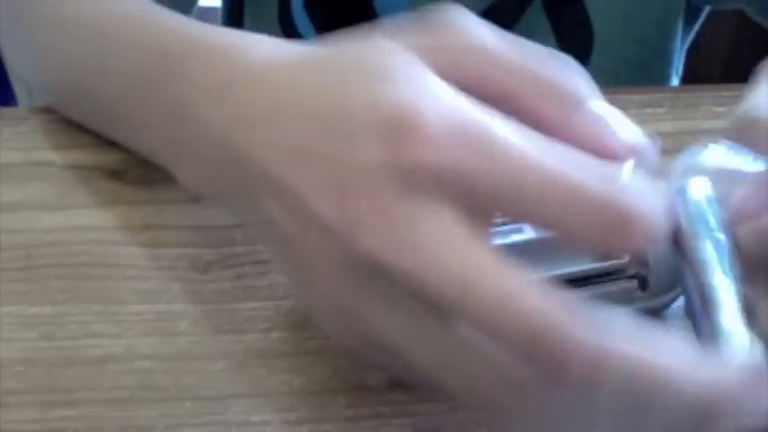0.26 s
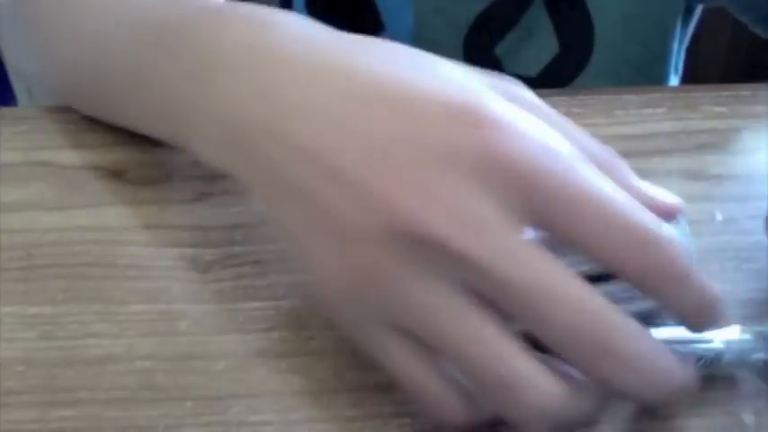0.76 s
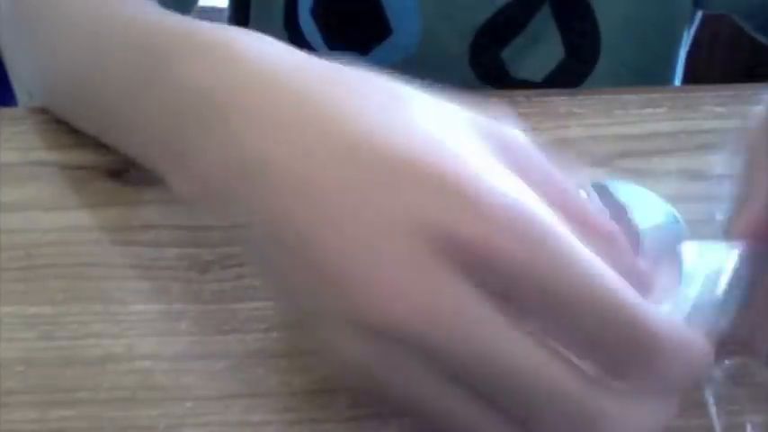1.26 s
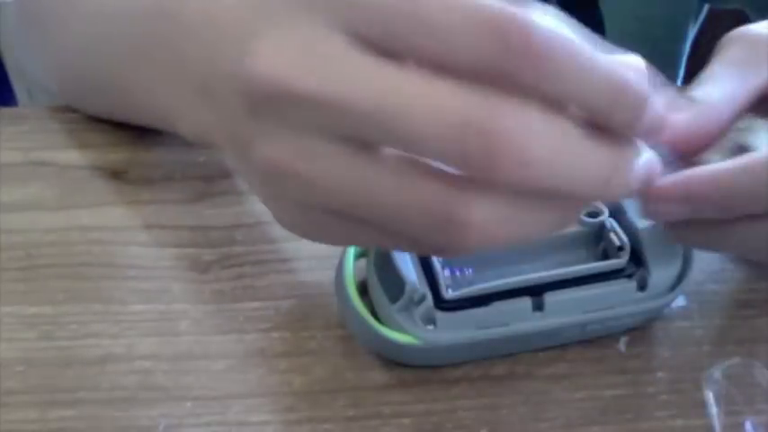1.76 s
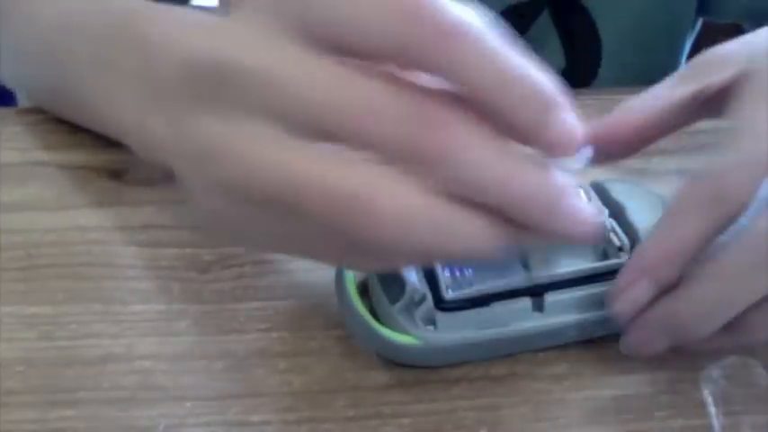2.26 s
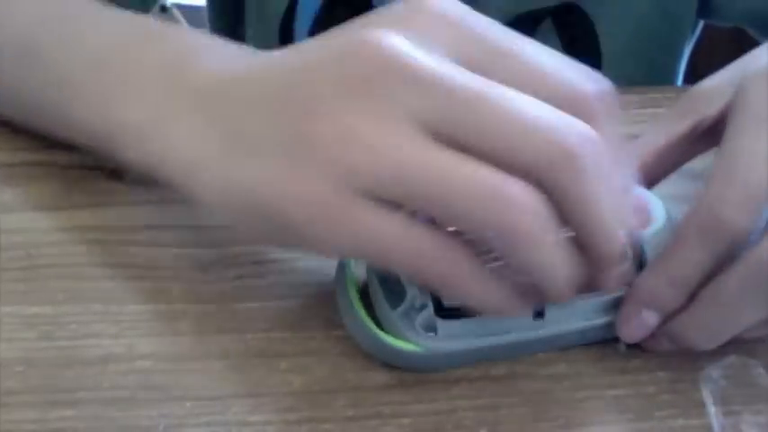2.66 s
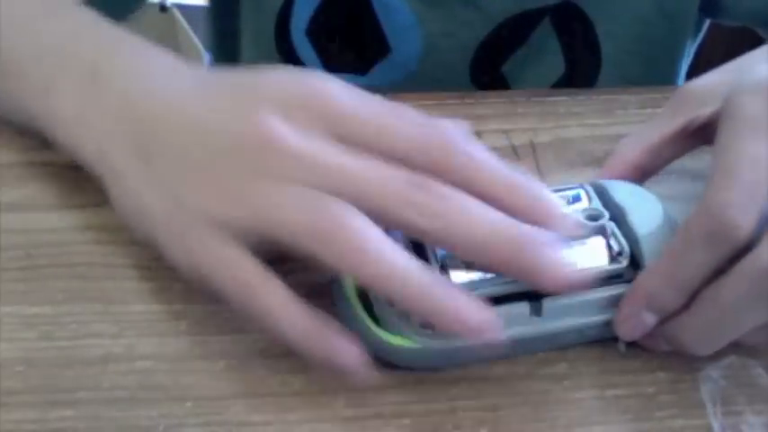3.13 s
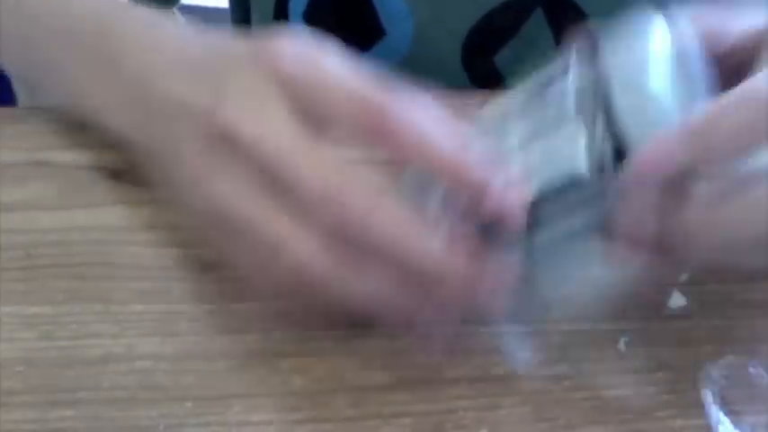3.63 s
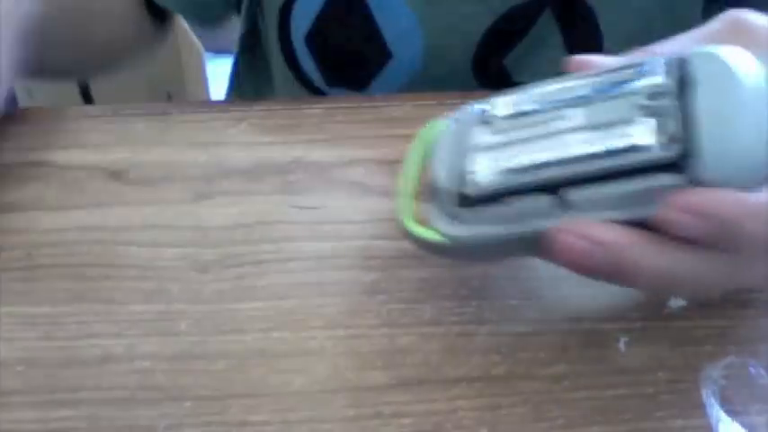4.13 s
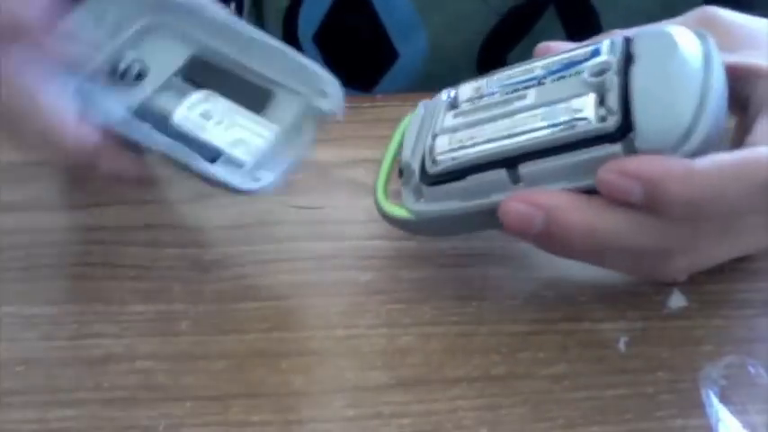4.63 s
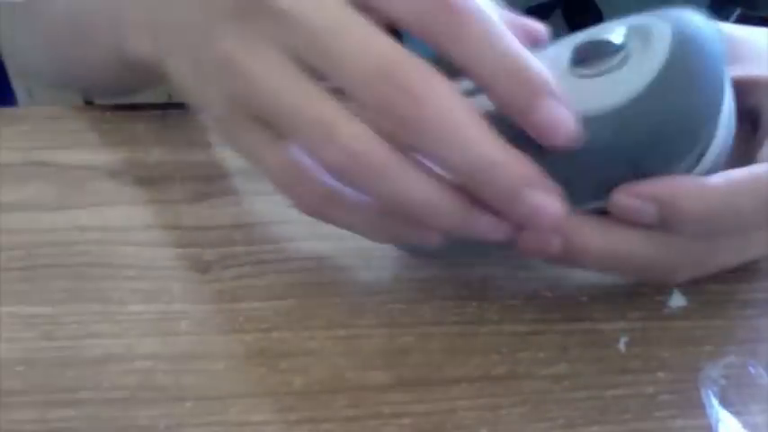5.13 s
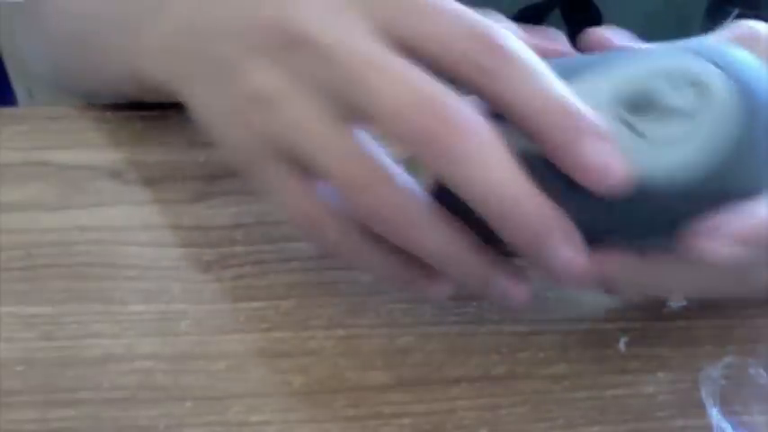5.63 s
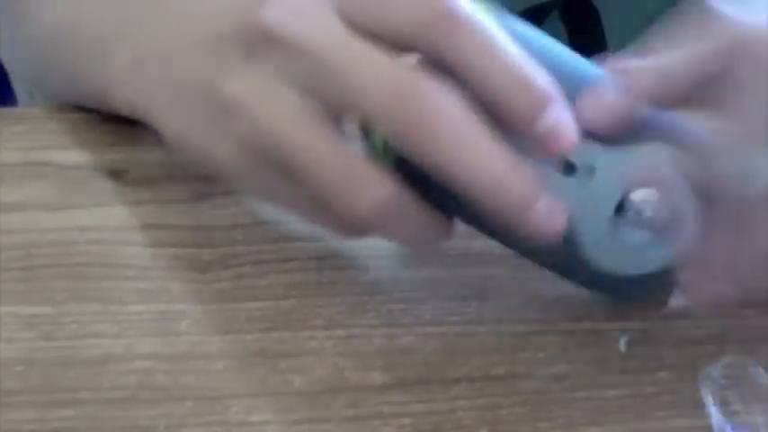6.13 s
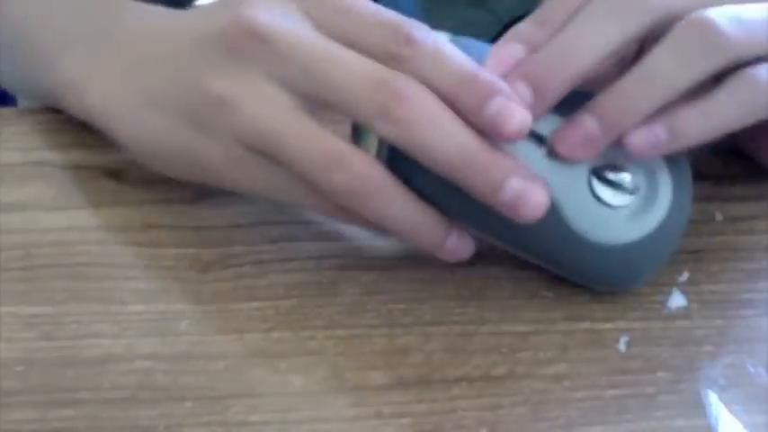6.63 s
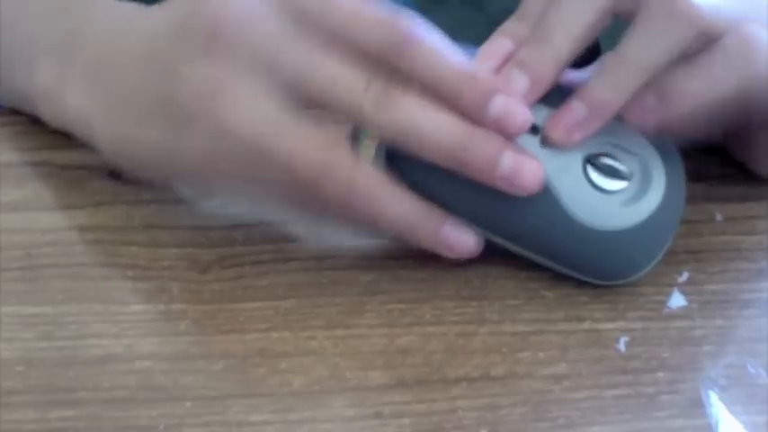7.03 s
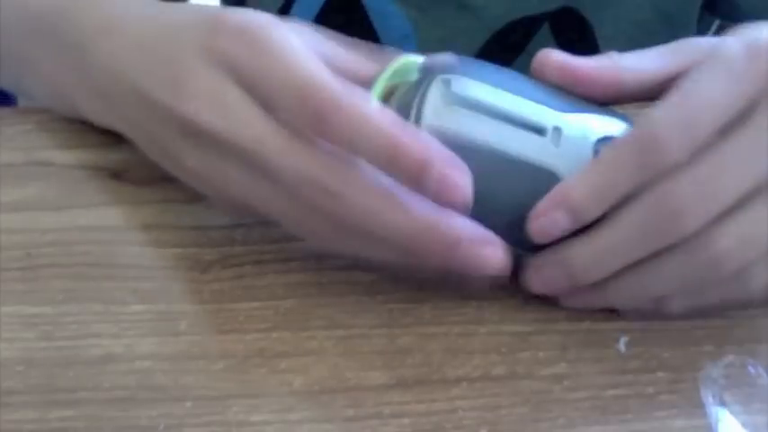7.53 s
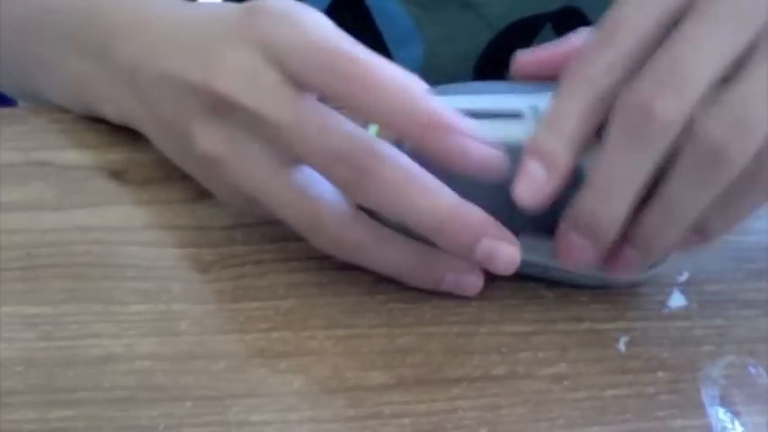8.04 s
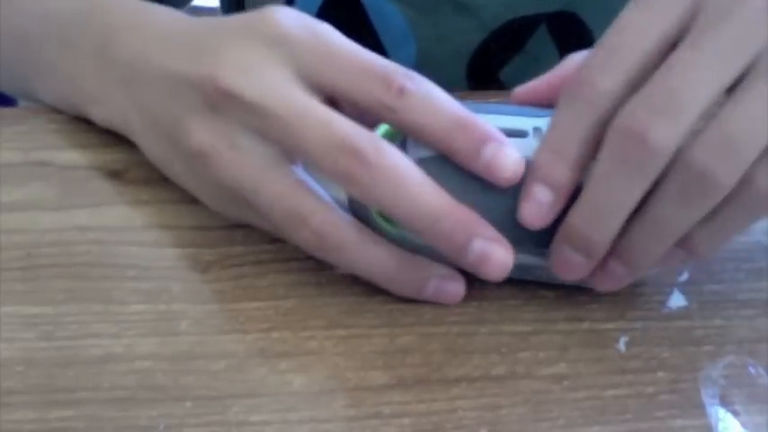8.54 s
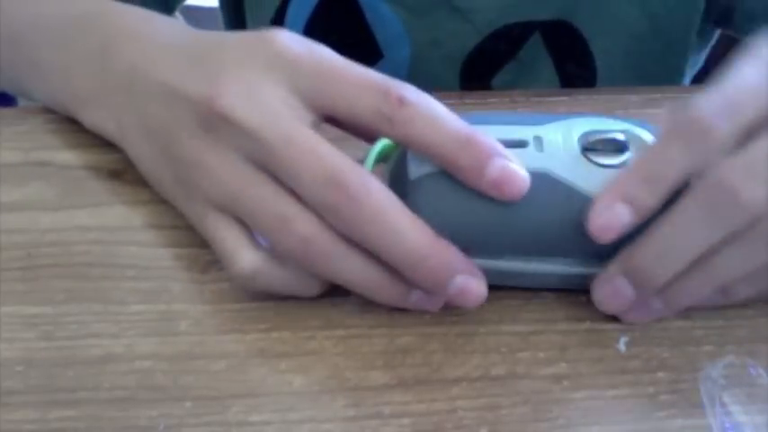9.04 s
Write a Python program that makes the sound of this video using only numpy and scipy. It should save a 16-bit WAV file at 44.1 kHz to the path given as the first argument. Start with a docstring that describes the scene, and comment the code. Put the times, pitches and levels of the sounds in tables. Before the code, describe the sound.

Very close in a small quiet room, film wrapping rustles and crackles over dull desk bumps, then loose batteries strike the wood in a loud overloaded clatter. After a pause, batteries click and snap into a plastic bay. A loose cover clacks brightly and scrapes, the case thuds down hard, and soft ticks and finger rubs follow until a final moderate knock.

```python
"""Batteries are taken from their wrapper, tumble on a wooden desk and are pressed into a handheld device.
The plastic cover is rattled on, rubbed and squeezed shut while the case bumps on the desk.
Blows are noise bursts shaped by resonances; rubs are trains of tiny slips over a hiss.
A small room, heard by one close microphone that overloads on the hardest knocks."""
import sys
import numpy as np
from scipy import signal
from scipy.fft import rfft, irfft
from scipy.io import wavfile
from scipy.ndimage import uniform_filter1d

SR = 44100
rng = np.random.default_rng(int(sys.argv[2]) if len(sys.argv) > 2 else 0)


def digitize_waveform(pressure):
    """Quantize a signal to 16-bit integers and store it at the path in sys.argv[1].

    Rows of a 2-D input are taken as channels; values are limited to [-1, 1].
    """
    field = np.atleast_2d(pressure).T
    bounded = np.clip(field, -1, 1)
    quanta = np.round(bounded * 32767).astype(np.int16)
    wavfile.write(sys.argv[1], SR, quanta)


N = 409688
SIZE = 8192  # samples in one blow or impulse response
HZ = np.fft.rfftfreq(SIZE, 1 / SR)

# Levels of blows are rms over 5 ms.
# Plastic bumps on the desk: start_s, thump_db, click_db, click_tilt [dB/octave]
BUMPS = [(.318, -24.5, -30.5, 0), (.387, -22.5, -52, -10), (.4125, -24, -21, -10.5), (.421, -18.5, -30, 1),
         (.526, -26, -38, -10.5), (.588, -23.5, -38, 6), (.768, -35, -58, -5), (1.0395, -22.5, -35, -7),
         (1.108, -30, -61, 1), (2.3005, -19.5, -46.5, -0.5), (2.445, -34, -59, 7), (2.4965, -24, -61, 9),
         (2.99, -44, -53.5, 5.5), (3.2285, -26.5, -62, 1), (3.524, -32.5, -63.5, -2),
         (4.095, -28.5, -33.5, -21), (7.231, -40, -51.5, -4.5), (7.255, -41.5, -43.5, -0.5),
         (7.4085, -36.5, -50.5, 3), (7.542, -29, -43, 2), (8.0977, -33.5, -27.5, 2.5),
         (8.619, -43, -46.5, -5)]
# The case is set down hard: start_s, thump_db, click_db, click_tilt [dB/octave]
LANDINGS = [(6.253, -6.5, -16, -5.5), (9.27, -19, -24.5, -6)]
# Loose batteries hit the desk and each other: start_s, level_db, tilt [dB/octave], rebound_gap_s
KNOCKS = [(.6073, -8, -0.3, 0.0017), (.626, -0.5, 1, 0.0042), (.651, -16.5, -1.5, 0.0028),
          (.6638, -6, 1.5, 0.0067), (.678, -8.5, -1, 0.0048)]
# Batteries slip past the springs into their bay: start_s, level_db, tilt [dB/octave], note_hz
SNAPS = [(2.2766, -32.5, -5, 3680), (2.6095, -16.5, -2.5, 3460), (2.6853, -14.5, -2.5, 1920),
         (2.7977, -25.5, -6.5, 4430)]

# Broad colour of rubbed surfaces, battery bay, cover and case: freq_hz, relative_db
RUB_COLOUR = [(500, -14.5), (1500, -7), (2300, -8.5), (4000, -1), (6500, -2.5), (9500, -16.5),
              (15000, -35.5)]
BAY_COLOUR = [(200, 1), (2200, 2.5), (3800, 5.5), (5000, -3.5), (7000, -4), (10000, -14.5), (15000, -25)]
COVER_COLOUR = [(200, -24.5), (600, -11.5), (2200, -5.5), (5000, 3), (7000, -1.5), (10000, -18),
                (15000, -36.5)]
CASE_COLOUR = [(200, -19), (600, -7.5), (2800, -2), (7000, -7.5), (10000, -20), (15000, -42.5)]
# Resonances of film, bay, cover, springs and case: freq_hz, width_hz, relative_db
FILM_MODES = [(6800, 3600, -0.5)]
BAY_MODES = [(1460, 100, -2.5), (2920, 270, -5.5), (3800, 270, -2), (5740, 400, 0)]
COVER_MODES = [(734, 34, 2), (1600, 400, 3), (1958, 120, 3.5), (2640, 60, 1.5), (3085, 80, 3.5),
               (4940, 100, -1)]
SPRING_MODES = [(1400, 17, 4.5), (4824, 54, -1), (6500, 41, -14)]
CASE_MODES = [(1650, 240, 1.5), (3720, 600, -5), (5850, 510, -6)]

CONTACT_RING_S = 0.0012  # snaps, touches and taps


def amp(db):
    """Decibels to gain."""
    return 10 ** (np.asarray(db) / 20)


def evened(x):
    """Scales to rms 1."""
    return x / np.sqrt(np.mean(x ** 2) + 1e-20)


def read(points, hz):
    """Reads (Hz, value) rows on a log-frequency axis."""
    f, value = np.transpose(points)
    return np.interp(np.log(hz + 1), np.log(f + 1), value)


def add(mix, s, sound):
    """Mixes a sound in at time s, or at 0 if s is negative."""
    part = mix[max(round(s * SR), 0):][:len(sound)]
    part += sound[:len(part)]


def causal(db):
    """Minimum-phase response with this gain: all ringing follows the blow."""
    log_gain = np.log(amp(np.maximum(db, db.max() - 90)))
    circle = np.concatenate([log_gain, log_gain[-2:0:-1]])
    return np.exp(np.conj(signal.hilbert(circle)))[:len(db)]


def resonance(hz, width_hz):
    """Power response of one resonance, 1 at its centre."""
    return 1 / (1 + (2 * (HZ - hz) / width_hz) ** 2)


def body(colour, modes, lift_db):
    """Gain in dB of a thing: resonances stand out of its broad colour, and it radiates no deep bass."""
    peaks = sum(amp(db + lift_db) ** 2 * resonance(hz, width_hz) for hz, width_hz, db in modes)
    bass = 1 / (1 + (colour[0][0] / (HZ + 1)) ** 2)
    return read(colour, HZ) + 10 * np.log10((1 + peaks) * bass)


def strike_point(spread_db):
    """Where a contact lands decides which of the many small resonances ring most."""
    centres_hz = 600 * (np.geomspace(1.2, 28, 64) - 1)
    gains_db = spread_db * rng.standard_normal(len(centres_hz))
    return read(list(zip(centres_hz, gains_db)), HZ)


def chatter(ring_s, shell_db, shell_s):
    """Spectrum of one contact: a dying burst of tiny collisions, then a weaker, longer shell shiver."""
    t = np.arange(SIZE) / SR
    fade = np.exp(-t / ring_s) + amp(shell_db) * np.exp(-t / shell_s)
    z = rfft(rng.standard_normal(SIZE) * fade, 2 * SIZE)
    burst = irfft(z / (abs(z) + 1e-9) ** 0.89)[:SIZE]  # no deep gaps across frequency
    return rfft(burst)


def blows(rows, body_db, bass_hz, treble_hz, shell_db):
    """Each contact rings the thing, tilted darker or brighter; some add a note of their own."""
    note_db, note_width_hz = 10.5, 460
    out = np.zeros(N)
    octaves = np.log2(np.clip(HZ, bass_hz, treble_hz))
    for s, db, tilt, ring_s, *notes_hz in rows:
        tone_db = body_db + tilt * octaves + strike_point(spread_db=3.5)
        for hz in notes_hz:
            tone_db = tone_db + note_db * resonance(hz, note_width_hz)
        hit = irfft(chatter(ring_s, shell_db, shell_s=0.018) * causal(tone_db))
        unit_hit = hit * np.sqrt(.005 * SR / np.sum(hit ** 2))  # rms 1 over 5 ms
        add(out, s, amp(db) * unit_hit)
    return out


def single(rows, ring_s):
    """Plain contacts (start_s, level_db, tilt, ring_s): one thing always rings about as long."""
    return [(s, db, tilt, ring_s) for s, db, tilt in rows]


def rattling(rows, ring_s, rebound_db):
    """A loose part strikes, rebounds ever sooner, weaker and duller, amid faint settling ticks."""
    gap_ratio, rebound_tilt = 0.79, -1.3  # per rebound; tilt change in dB/octave
    settle_s, settle_db = 0.07, -27  # ticks: time span, level relative to the blow
    contacts = []
    for s, db, tilt, gap_s, *note_hz in rows:
        for late in rng.random(size=3):
            contacts.append((s + late * settle_s, db + settle_db, tilt, ring_s / 2))
        for k in range(3):
            contacts.append((s, db + k * rebound_db, tilt + k * rebound_tilt, ring_s, *note_hz))
            s += gap_s * gap_ratio ** k
    return contacts


def clicking(rows, ring_s):
    """The plastic clicks as it meets the desk."""
    return single([(s, click_db, tilt) for s, _, click_db, tilt in rows], ring_s)


def thumping(rows, share_db=0):
    """The desk top takes the weight: the gentler the push, the duller the thump."""
    ring_s, firm_db = 0.0038, -9.5
    dulling = 0.23  # dB/octave lost per dB under a firm blow
    contacts = []
    for s, db, *_ in rows:
        thump_db = db + share_db
        contacts.append((s, thump_db, dulling * (thump_db - firm_db), ring_s))
    return contacts


def sliding(rows, shell_db, slips_per_s, hiss_db):
    """Surfaces stick and slip unevenly, each spot with its own ring, over a hiss that travels."""
    slip_spread_db, flutter_db, travel_db = 7, 1, 6.5  # slip size, pressure waver, spot-to-spot ring
    out = np.zeros(N)
    for middle_s, length_s, db, treble_db in rows:
        n = int(np.clip(length_s, .01, .5) * SR)
        tone_db = shell_db + read([(2500, 0), (8000, treble_db)], HZ)
        rub, path, places = np.zeros(n), np.linspace(0, 1, n), np.linspace(0, 1, 6)
        for place in places:
            chance, size = rng.random(SR // 2)[:n], rng.exponential(1, SR // 2)[:n]
            hiss = rng.standard_normal(SR // 2)[:n]
            slipped = chance < slips_per_s / len(places) / SR
            slips = slipped * amp(slip_spread_db * np.minimum(size, 2)) * np.sign(hiss)
            near_spot = evened(np.maximum(1 - 2 * abs(path - place), 0) ** 2)
            spot = irfft(causal(tone_db + strike_point(travel_db)))
            drive = evened(slips) + amp(hiss_db) * near_spot * hiss
            rub += signal.fftconvolve(drive, evened(spot))[:n]
        waver = uniform_filter1d(rng.standard_normal(SR), size=300)
        flutter = amp(flutter_db * evened(waver)[:n])
        add(out, middle_s - length_s / 2, amp(db) * evened(rub * flutter) * np.hanning(n))
    return out


def air():
    """A steady low rumble and faint hiss from filtered noise, whose level dips briefly."""
    # Room noise: freq_hz, relative_db
    noise_colour = [(25, -32), (110, -7), (170, 0), (600, -19), (2000, -27), (4000, -28), (7000, -38),
                    (16000, -57)]
    # Brief dip: time_s, offset_db
    lull = [(7.421, 0.5), (7.46, -30), (7.509, 2.5)]
    base_db = -66  # before the offset
    hz = np.fft.rfftfreq(N, 1 / SR)
    noise = evened(irfft(rfft(rng.standard_normal(N)) * amp(read(noise_colour, hz)), N))
    offset_db = np.interp(np.arange(N) / SR, *np.transpose(lull))
    return amp(base_db + offset_db) * noise


def film_rustles():
    """The film wrapper rustles: sparse slips ring its broad resonance."""
    # Rustles: middle_s, length_s, level_db before the fade in and out, extra_treble_db
    rustles = [(.06, 0.27, -47.5, -5), (.172, 0.082, -44, 7), (.221, 0.039, -49, 11),
               (.279, 0.043, -48, 1.5), (.365, 0.12, -44, -0.5), (.44, 0.076, -46.5, -3.5),
               (.98, 0.11, -53.5, -14.5)]
    return sliding(rustles, body(RUB_COLOUR, FILM_MODES, lift_db=8.5), slips_per_s=210, hiss_db=-4)


def film_crackles():
    """The film wrapper buckles in very short bright clicks."""
    # Crackles: start_s, level_db, tilt [dB/octave]
    crackles = [(.0058, -33.5, 3.5), (.0105, -40, 1), (.0256, -46, 2), (.0475, -34.5, 3), (.0625, -37, 2.5),
                (.075, -41, 11), (.1035, -37.5, 14), (.1088, -34.5, 4), (.1225, -45, 12), (.134, -40, 4),
                (.2618, -44, 16), (.284, -45, 0), (.342, -36.5, 1.5), (.3465, -38.5, 2), (.3593, -38.5, -1),
                (.4304, -42.5, -3), (.4627, -47.5, -3.5), (.5525, -41.5, -1), (.8406, -40, -1.5),
                (.977, -36.5, 4), (1.7606, -48, -4)]
    # Film colour: freq_hz, relative_db
    film_colour = [(200, -34), (600, -17), (2200, -15), (3500, 2), (7000, 0.5), (10000, -13), (15000, -27)]
    film_db = body(film_colour, FILM_MODES, lift_db=3.5)
    return blows(single(crackles, ring_s=.0005), film_db, 800, 9000, shell_db=-36)


def room(x, build_s, taps_per_s):
    """Sparse wall reflections build up, then each band dies at its own speed."""
    # Room tail: band_hz, t60_s, level_db
    bands = [(152, 0.14, -4.5), (463, 0.23, -12), (1520, 0.21, -11.5), (7000, 0.27, -17.5)]
    n = SR // 2
    t, hz = np.arange(n) / SR, np.fft.rfftfreq(n, 1 / SR)
    taps = rfft(rng.choice([-1., 1.], n) * (rng.random(n) < taps_per_s / SR))
    tail, centres_hz = np.zeros(n), [row[0] for row in bands]
    for (_, t60_s, db), share in zip(bands, np.eye(len(bands))):
        fade = amp(-60 * (t / t60_s) ** 1.25) * (1 - np.exp(-(t / build_s) ** 2))
        band = irfft(taps * read(list(zip(centres_hz, share)), hz), n)
        tail += amp(db) * band * fade / np.linalg.norm(irfft(taps, n) * fade)
    return signal.fftconvolve(x, tail)[:N]


def desk_thumps():
    """The wooden desk top booms under bumps and landings, and takes a share of snaps and knocks."""
    # Desk colour: freq_hz, relative_db
    desk_colour = [(60, -21), (120, -6), (190, 2), (320, -3), (450, -0.5), (700, -11), (1100, -15),
                   (6000, -74.5)]
    # Desk resonances: freq_hz, width_hz, relative_db
    desk_modes = [(190, 42, -7), (257.6, 28, -7), (430, 130, -5), (900, 36, -4.5)]
    thumps = thumping(BUMPS + LANDINGS) + thumping(SNAPS, share_db=-10) + thumping(KNOCKS, share_db=-14)
    return blows(thumps, body(desk_colour, desk_modes, lift_db=11.0), 66, 1200, shell_db=-23)


def bump_clicks():
    """The plastic case resonates in a short click at each bump on the desk."""
    case_db = body(CASE_COLOUR, CASE_MODES, lift_db=13.5)
    return blows(clicking(BUMPS, ring_s=0.0014), case_db, 590, 9000, shell_db=-25)


def battery_touches():
    """Batteries click lightly, at the desk and in the bay: short bursts through one set of resonances."""
    # Touches: start_s, level_db, tilt [dB/octave]
    touches = [(.5925, -34, -0.5), (2.2402, -54.5, 2.5), (2.273, -38.5, 7), (2.3932, -51, 5),
               (2.476, -41, 2), (2.482, -41, 0), (2.5665, -48, -5), (2.6035, -42, 10), (2.664, -36, 8),
               (2.7365, -34.5, 10), (2.8995, -52.5, 2), (3.6547, -43.5, 3)]
    bay_db = body(BAY_COLOUR, BAY_MODES, lift_db=12.0)
    return blows(single(touches, CONTACT_RING_S), bay_db, 740, 6600, shell_db=-27)


def battery_knocks():
    """Loose batteries strike and rebound, ringing their narrow modes."""
    # Battery colour: freq_hz, relative_db
    battery_colour = [(200, -19.5), (1200, 1), (3500, 2), (5000, -7.5), (7000, -16), (15000, -33)]
    # Battery resonances: freq_hz, width_hz, relative_db
    battery_modes = [(2270, 45, -4.5), (2880, 97, -1), (3310, 29, -1.5), (4010, 63, 1.5)]
    knocks = rattling(KNOCKS, ring_s=0.003, rebound_db=-4.0)
    return blows(knocks, body(battery_colour, battery_modes, lift_db=7.0), 500, 9000, shell_db=-16.0)


def finger_squeaks():
    """Fingertips drag with a thin squeak: rapid slips excite two narrow resonances."""
    # Squeaks: middle_s, length_s, level_db before the fade in and out, extra_treble_db
    squeaks = [(1.56, .24, -70.5, 0), (3.86, 0.069, -60.5, -17.5)]
    # Squeak resonances: freq_hz, width_hz, relative_db
    squeak_modes = [(4040, 190, 4), (6330, 200, -6)]
    return sliding(squeaks, body(RUB_COLOUR, squeak_modes, lift_db=24), slips_per_s=1300, hiss_db=-5)


def plastic_strokes():
    """Fingers and batteries brush the plastic in hissy stick-slip."""
    # Strokes: middle_s, length_s, level_db before the fade in and out, extra_treble_db
    strokes = [(1.66, 0.15, -57, -12.5), (3.67, 0.22, -55.5, 1), (4.165, 0.12, -49.5, -5.5),
               (4.665, 0.14, -58, -8), (6.655, 0.11, -56, -15), (7.112, 0.072, -54.5, 12),
               (7.24, 0.046, -52, -9), (7.79, 0.096, -51, -11), (8.78, 0.21, -54.5, -7)]
    # Rubbed plastic resonances: freq_hz, width_hz, relative_db
    rub_modes = [(1280, 130, -6.5), (2197, 150, 3), (3350, 1000, -4.5)]
    return sliding(strokes, body(RUB_COLOUR, rub_modes, lift_db=10), slips_per_s=600, hiss_db=1.5)


def battery_snaps():
    """The battery drops home with a note that depends on how it sits."""
    snaps = [(s, db, tilt, CONTACT_RING_S, hz) for s, db, tilt, hz in SNAPS]
    return blows(snaps, body(BAY_COLOUR, BAY_MODES, lift_db=12.0), 740, 6600, shell_db=-27)


def battery_shoves():
    """A battery is shoved along its bay, which rings at each slip."""
    # Shoves: middle_s, length_s, level_db before the fade in and out, extra_treble_db
    shoves = [(2.472, 0.16, -50, -5.5), (2.725, 0.067, -38, -7)]
    return sliding(shoves, body(RUB_COLOUR, BAY_MODES, lift_db=14), slips_per_s=190, hiss_db=-0.5)


def plastic_clacks():
    """Light plastic, the battery pack and the loose cover, clacks and rebounds with its own note."""
    # Clacks: start_s, level_db, tilt [dB/octave], rebound_gap_s, note_hz
    clacks = [(4.0942, -32, -7.5, .004, 1000), (4.105, -30, -9.5, 0.0042, 2800),
              (4.752, -15, -4.5, 0.0015, 4900), (4.868, -18.5, 0, 0.0011, 3300),
              (4.8798, -9.5, -1.5, 0.0022, 2250), (4.9365, -10.5, 0, 0.0058, 4600),
              (5.078, -28, -0.5, 0.0078, 4860), (5.0955, -21, -2.5, .0092, 1730),
              (5.2558, -23, -3, 0.00088, 1670), (5.2655, -24.5, -4, 0.0033, 3140),
              (5.4658, -22.5, 0, 0.0069, 5530)]
    contacts = rattling(clacks, ring_s=0.0026, rebound_db=-5.5)
    return blows(contacts, body(COVER_COLOUR, COVER_MODES, lift_db=4), 1000, 8960, shell_db=-17)


def edge_judders():
    """The edge of a loose plastic part judders along in sparse slips."""
    # Judders: middle_s, length_s, level_db before the fade in and out, extra_treble_db
    judders = [(4.123, 0.039, -39.5, -7.5), (4.903, 0.089, -28.5, -5), (5.098, 0.075, -35, 0.5)]
    return sliding(judders, body(RUB_COLOUR, COVER_MODES, lift_db=11), slips_per_s=260, hiss_db=-5.5)


def spring_grazes():
    """A soft graze on the open case sets the springs' narrow modes singing."""
    # Grazes: middle_s, length_s, level_db before the fade in and out, extra_treble_db
    grazes = [(4.318, .075, -58, 17)]
    return sliding(grazes, body(RUB_COLOUR, SPRING_MODES, lift_db=20), slips_per_s=900, hiss_db=3)


def spring_pings():
    """A spring rings faintly in its narrow modes as the case is turned."""
    # Pings: start_s, level_db, tilt [dB/octave]
    pings = [(4.496, -48.5, 1)]
    spring_db = body(COVER_COLOUR, SPRING_MODES, lift_db=22.0)
    return blows(single(pings, ring_s=0.0057), spring_db, 800, 8800, shell_db=-25)


def plastic_taps():
    """Light plastic clicks singly, between and after the louder clacks."""
    # Taps: start_s, level_db, tilt [dB/octave]
    taps = [(4.8595, -25.5, -1.5), (4.918, -23, -5), (4.9418, -9, 0.5), (5.132, -32.5, 0.5),
            (5.1635, -40, -5), (5.2358, -37.5, -6.5), (5.283, -38, -5.5), (5.2903, -31, -2),
            (5.336, -48, -2), (5.4612, -45, 7), (5.8236, -40, 0.5)]
    cover_db = body(COVER_COLOUR, COVER_MODES, lift_db=4)
    return blows(single(taps, CONTACT_RING_S), cover_db, 1000, 8960, shell_db=-17)


def cover_scrapes():
    """The cover scrapes over the case, whose shell colours the slips."""
    # Scrapes: middle_s, length_s, level_db before the fade in and out, extra_treble_db
    scrapes = [(5.626, 0.15, -47.5, 5.5), (5.715, 0.15, -51.5, 5.5), (5.921, 0.26, -49.5, 10.5),
               (6.096, 0.12, -50, 4), (6.24, .05, -52, 10.5)]
    return sliding(scrapes, body(RUB_COLOUR, CASE_MODES, lift_db=7.5), slips_per_s=260, hiss_db=-1.5)


def case_landings():
    """The case clicks as it is set down hard; the grip damps the shell."""
    case_db = body(CASE_COLOUR, CASE_MODES, lift_db=-2)
    return blows(clicking(LANDINGS, ring_s=0.0042), case_db, 740, 8770, shell_db=-32.0)


def case_ticks():
    """The case ticks and resonates as it is gripped and squeezed shut."""
    # Ticks: start_s, level_db, tilt [dB/octave]
    ticks = [(6.865, -50, -5.5), (6.8853, -49, -5.5), (6.905, -51, -8), (7.049, -45, -2.5),
             (7.0883, -47, -1), (7.3502, -52, 1), (7.379, -51, 2), (7.505, -52, 2), (7.582, -45, 0),
             (7.6062, -41.5, -0.5), (7.69, -50.5, -10), (7.7088, -34.5, -7.5), (7.7832, -43, -2.5),
             (7.828, -46, -15), (7.842, -50, -1.5), (8.0845, -40, -2), (8.3834, -49.5, -2.5),
             (8.5448, -38, -3.5)]
    case_db = body(CASE_COLOUR, CASE_MODES, lift_db=13.5)
    return blows(single(ticks, ring_s=0.0022), case_db, 590, 9000, shell_db=-25)


def finger_slides():
    """A finger slides on the closed case and makes its resonances sing."""
    # Slides: middle_s, length_s, level_db before the fade in and out, extra_treble_db
    slides = [(7.91, 0.3, -55.5, -16)]
    # Singing case resonances: freq_hz, width_hz, relative_db
    slide_modes = [(1930, 105, 5.5), (2250, 140, 0.5), (3720, 210, 2.5), (4220, 150, -4), (6770, 120, -3)]
    return sliding(slides, body(RUB_COLOUR, slide_modes, lift_db=29), slips_per_s=900, hiss_db=10)


def scene():
    """All the handling, close to the microphone, with the room behind it."""
    wrapper = film_rustles() + film_crackles()
    desk = desk_thumps() + bump_clicks() + case_landings()
    batteries = battery_touches() + battery_knocks() + battery_snaps() + battery_shoves()
    rubs = finger_squeaks() + plastic_strokes() + finger_slides()
    springs = spring_grazes() + spring_pings()
    plastic = plastic_clacks() + edge_judders() + plastic_taps() + cover_scrapes()
    near = wrapper + desk + batteries + rubs + springs + plastic + case_ticks()
    return (near + room(near, build_s=0.011, taps_per_s=3000) + air())[None]


def record(dry):
    """The small microphone flattens the highest peaks and loses the deep bass; then the band limit."""
    knee, ceiling = .5, .87  # full scale = 1
    edge_hz = 16400
    over = np.maximum(abs(dry) - knee, 0)
    squashed = (ceiling - knee) * np.tanh(over / (ceiling - knee))
    held = np.sign(dry) * (abs(dry) - over + squashed)
    thin = signal.sosfilt(signal.butter(3, 62, "high", fs=SR, output="sos"), held)
    low_pass = signal.firwin(301, edge_hz, window=("kaiser", 9), fs=SR)
    return signal.oaconvolve(thin, low_pass[None], "same")


dry = scene()
out = record(dry)
digitize_waveform(out)
```